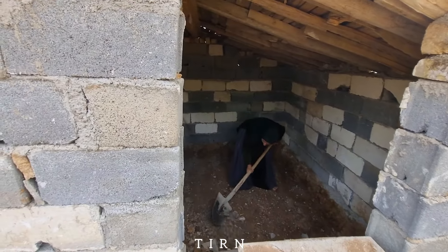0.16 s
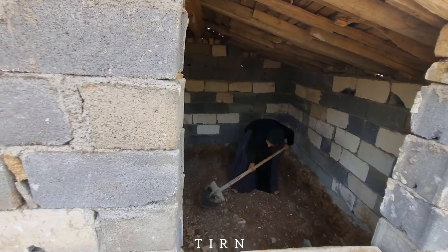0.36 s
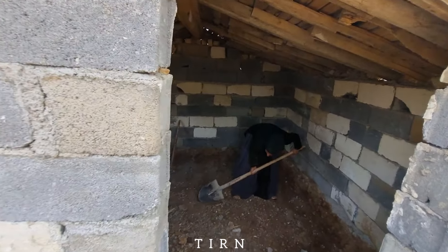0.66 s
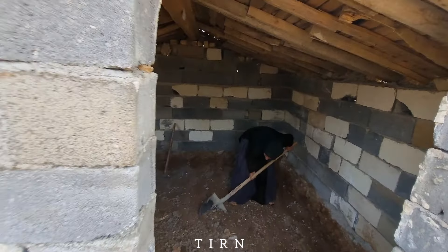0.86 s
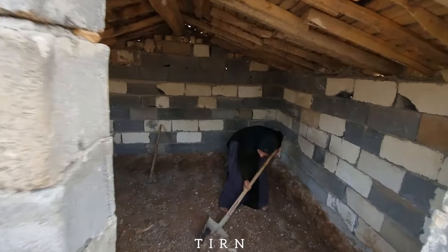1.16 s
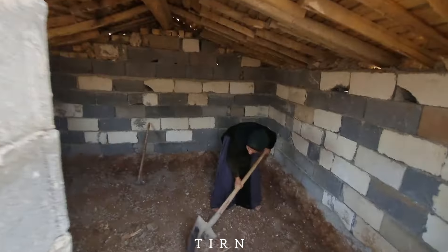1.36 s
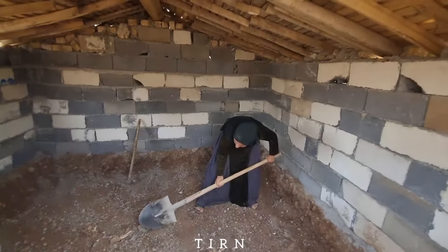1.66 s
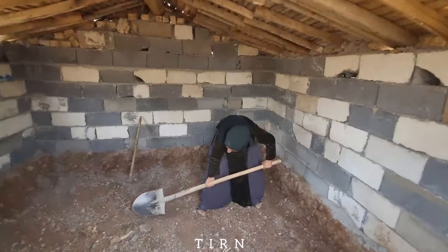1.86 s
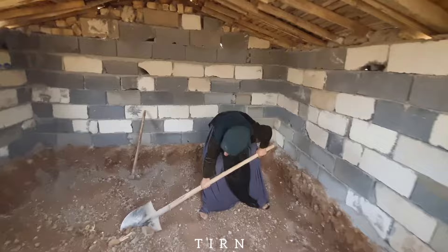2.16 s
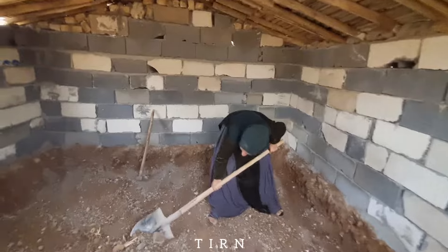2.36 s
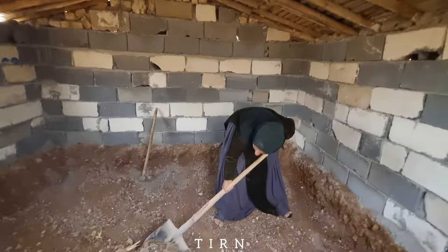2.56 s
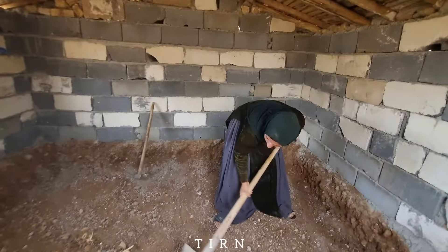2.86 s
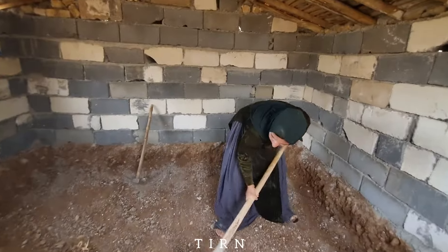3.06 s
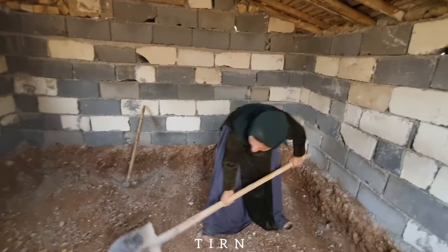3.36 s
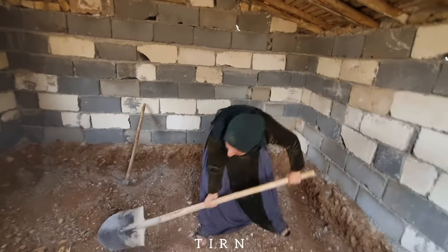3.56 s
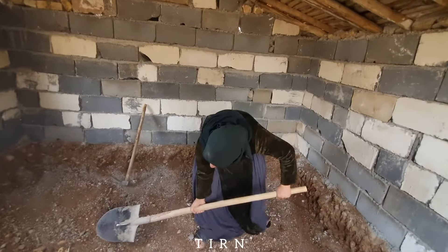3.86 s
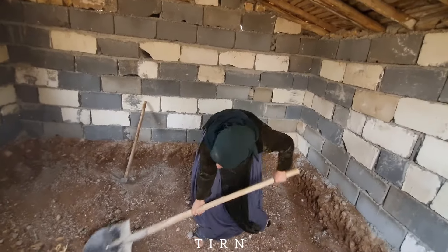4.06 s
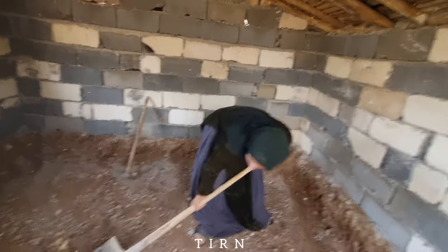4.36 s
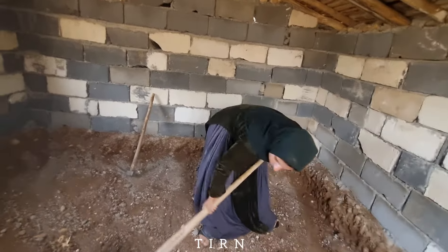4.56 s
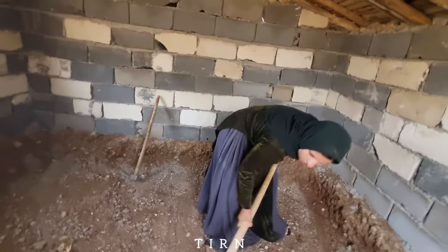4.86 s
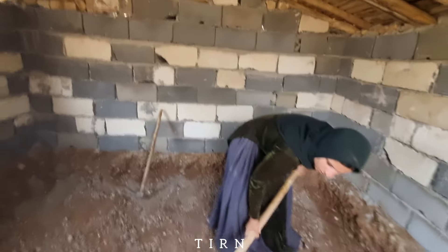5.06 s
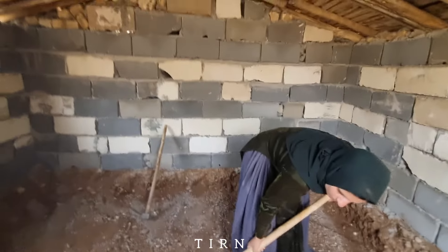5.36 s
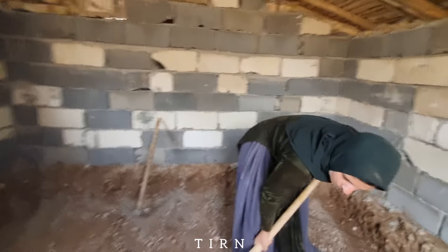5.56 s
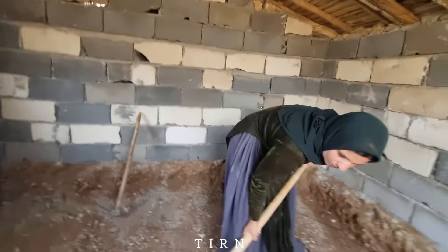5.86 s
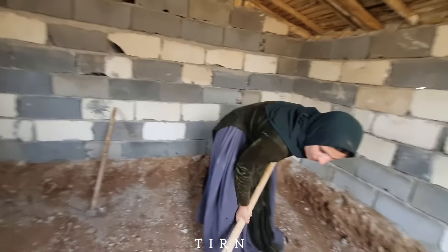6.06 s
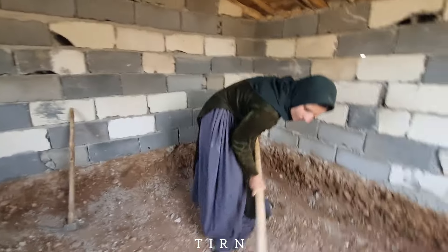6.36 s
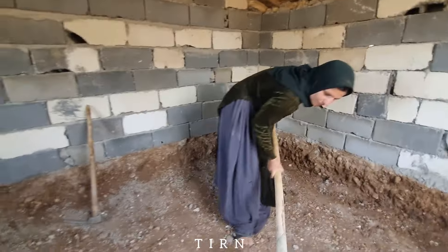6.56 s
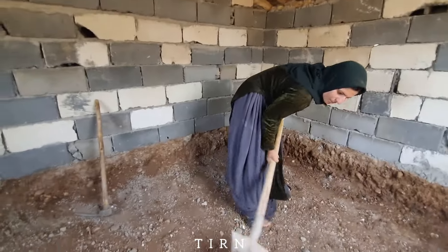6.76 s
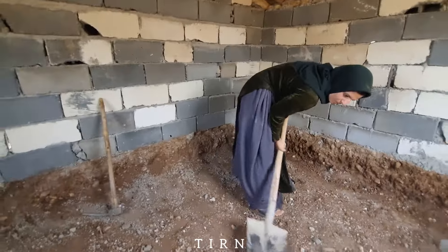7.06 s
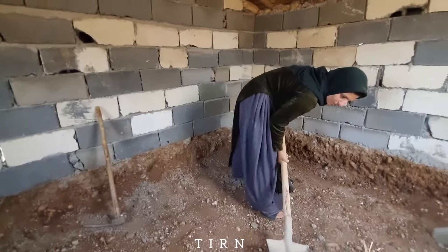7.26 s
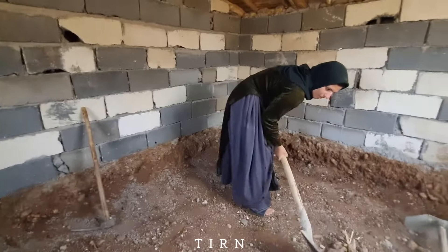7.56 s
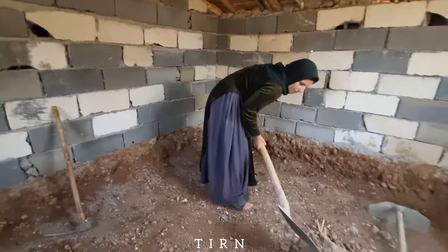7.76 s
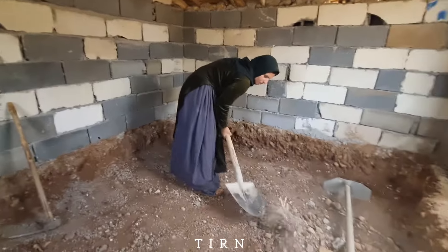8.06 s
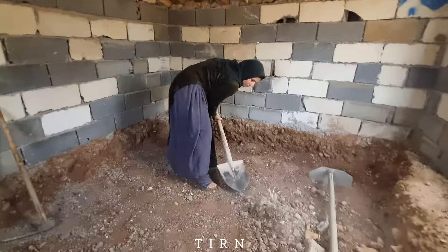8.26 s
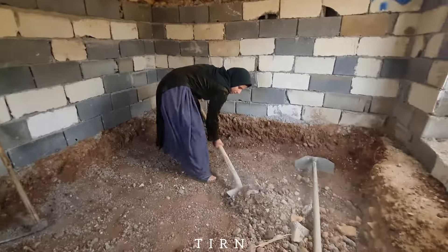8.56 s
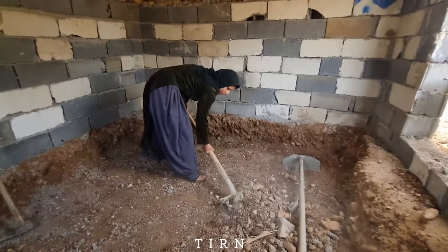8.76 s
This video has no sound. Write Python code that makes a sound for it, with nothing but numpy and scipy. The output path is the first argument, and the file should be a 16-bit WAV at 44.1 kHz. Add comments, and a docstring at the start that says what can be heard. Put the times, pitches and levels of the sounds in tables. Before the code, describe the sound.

Close, uneven shovel strokes scrape through the stony earth floor of a small shed, with very short echoes off the walls. Sand and gravel slide over the steel and stones knock against it. After some softer scraping, the blade bites harder from about halfway, jamming on stones, clinking and thudding into the ground, and ends with one hard shove. Behind it are a faint hiss and a low rumble that fades.

```python
"""Inside a small block-walled shed with an earth floor, two microphone ports stand near a steel shovel,
off to one side, over a low rumble and a faint hiss. The first strokes grind clods, gravel and sand over
the faintly ringing blade, and stones knock on it at about one second. Lighter scrapes follow. From four
seconds the digging is harder: stones jam and crunch, loose pebbles tick, the blade thuds into the ground.
The rumble sinks away, and a last hard push comes just after eight seconds."""
import sys
import numpy as np
from scipy import signal
from scipy.fft import rfft, irfft
from scipy.io import wavfile

SR = 44100
rng = np.random.default_rng(int(sys.argv[2]) if len(sys.argv) > 2 else 0)


def master_out(mix):
    """Clip the mix to full scale and print it as 16-bit PCM to the path in sys.argv[1]."""
    frames = np.transpose(np.atleast_2d(mix))
    ceiling = np.clip(frames, -1, 1)
    pcm = np.round(ceiling * 32767).astype(np.int16)
    wavfile.write(sys.argv[1], SR, pcm)


N = 392490


def from_db(db):
    return 10 ** (np.asarray(db) / 20)


def unit_rms(x):
    return x / np.sqrt(np.mean(x ** 2) + 1e-20)


def in_time(rows):
    return np.interp(np.arange(N) / SR, *np.transpose(rows))


def butter(x, hz, kind):
    return signal.sosfilt(signal.butter(2, hz, kind, fs=SR, output="sos"), x)


def colour(x, spectrum):
    """Causal (minimum-phase) filter with the given dB spectrum."""
    hz, db = np.transpose(spectrum)
    grid = np.maximum(np.arange(2049) * SR / 4096, 1)
    gain = from_db(np.interp(np.log(grid), np.log(hz), db))
    cepstrum = irfft(np.log(gain))
    cepstrum[1:2048] *= 2
    cepstrum[2049:] = 0
    return signal.oaconvolve(x, irfft(np.exp(rfft(cepstrum))))[:N]


def drift(hz):
    """A slow random wander with a spread of 1."""
    r = np.exp(-2 * np.pi * hz / SR)
    return unit_rms(signal.lfilter([1], [1, -2 * r, r * r], rng.standard_normal(N + SR))[SR:])


def ring(clicks, hz, t60):
    """A unit click sets a sine of height 1 ringing."""
    r, w = from_db(-60 / (t60 * SR)), 2 * np.pi * hz / SR
    return signal.lfilter([0, np.sin(w)], [1, -2 * r * np.cos(w), r * r], clicks + 1e-18)


def grains(per_s, spread_db, clump_db):
    """Random contacts of uneven size that come in clumps."""
    sizes = from_db(spread_db * np.minimum(rng.exponential(1, N), 4.2)) * rng.choice([-1, 1], N)
    hits = rng.random(N) < per_s / SR
    return unit_rms(sizes * hits * from_db(clump_db * drift(30)))


# The hiss at the microphone. Each row: frequency in Hz, relative level in dB.
HISS_SPECTRUM = [(15, -63.5), (25, -2), (70, -1.5), (277, -12), (1840, -4), (3720, -60), (5430, -0.5),
                 (10700, -31), (13200, 2.5), (16000, -9)]

def hiss():
    """A faint steady hiss: its lows are shared by the ports, its highs mostly each port's own."""
    noise = 0.26 * rng.standard_normal(N) + butter(rng.standard_normal((2, N)), 400, "high")
    return from_db(-70) * unit_rms(np.array([colour(x, HISS_SPECTRUM) for x in noise]))


# The rumble in the shed. Each row: frequency in Hz, relative level in dB.
RUMBLE_SPECTRUM = [(25, -16.5), (45, -3.5), (64, 16.5), (100, 2.5), (160, 1), (300, -24.5)]
# The rumble between strokes. Each row: time in seconds, level in dB.
RUMBLE_LEVEL = [(0.0, -62), (5.08, -60.5), (8.9, -71)]

def rumble(digging):
    """A low rumble, nearly alike at both ports, that swells with the bass of the digging."""
    shake = np.sqrt(np.abs(butter(butter(digging, 340, "low") ** 2, 15, "low")))
    level = from_db(in_time(RUMBLE_LEVEL)) + from_db(-18.5) * shake
    noise = rng.standard_normal(N) + 0.17 * rng.standard_normal((2, N))
    return level * unit_rms(np.array([colour(x, RUMBLE_SPECTRUM) for x in noise]))


def shed_echoes(x, t60=0.075, changes=24):
    """Dense echoes off the near walls, different at each port, changing as shovel and microphone move."""
    t, out = np.arange(round(.2 * SR)) / SR, np.zeros((2, N + SR))
    hop = N // changes + 1
    padded = np.pad(x, hop)
    for k in range(changes + 1):
        echoes = rng.standard_normal((2, len(t))) * from_db(-60 * t / t60) * (t > .001)
        echoes = butter(echoes, 15000, "low")
        echoes /= np.sqrt(np.sum(echoes ** 2, axis=1, keepdims=True))
        part = padded[k * hop:(k + 2) * hop]
        crossfade = np.sqrt(np.hanning(2 * hop))[:len(part)]
        heard = signal.fftconvolve(part[None] * crossfade, echoes)
        out[:, k * hop:k * hop + heard.shape[1]] += heard
    return out[:, hop:hop + N]


# Thuds in the earth floor. Each row: start in seconds, level in dB, nominal pitch in Hz.
THUDS = [(0.855, -28, 105), (1.099, -30.5, 133), (2.054, -27, 79), (3.675, -36, 94), (4.122, -33, 83),
         (5.551, -22, 90.5), (7.183, -25.5, 128), (8.444, -22, 80.5), (8.481, -28, 75)]

def thuds(t60=.11):
    """The blade hits the ground: dull noise and a low tone that sinks as the soil gives."""
    out = np.zeros(N)
    for start, db, hz in THUDS:
        i = round(start * SR)
        t = np.arange(min(N - i, SR // 2)) / SR
        phase = 2 * np.pi * hz * (.65 * t + 0.0175 * (1 - np.exp(-t / 0.033)))
        dull = unit_rms(butter(rng.standard_normal(len(t)), [.5 * hz, 2 * hz], "band"))
        envelope = from_db(db - 60 * t / t60) * (1 - np.exp(-t / 0.0098))
        out[i:i + len(t)] += envelope * (np.sin(phase) + .8 * dull)
    return out


# Loose single pebbles. Each row: start in seconds, level in dB, pitch in Hz.
TICKS = [(0.386, -29, 5900), (1.5963, -42, 930), (1.622, -20, 12600), (1.6595, -37.5, 1400),
         (1.732, -35.5, 2560), (1.7814, -36, 8450), (1.83, -40.5, 5760), (3.2214, -31, 3000),
         (3.266, -27, 2580), (5.0152, -21.5, 4900), (5.116, -48, 2800), (5.611, -13, 2560),
         (5.677, -11.5, 3000), (5.7236, -21.5, 2770), (5.7819, -19, 4920), (6.5387, -14.5, 5500),
         (6.554, -26, 2500), (6.7904, -27.5, 5300), (6.877, -34, 1450), (7.385, -31, 2620),
         (7.482, -19, 6150), (7.9648, -27.5, 2700), (8.223, -23, 12500), (5.678, -31, 13500),
         (0.4, -28, 5500), (6.682, -30, 5700)]

def pebble_ticks(dust_db=-17.5, dust_s=0.0015):
    """A tick is a few cycles at the pebble's pitch and a puff of dust knocked loose."""
    t, out = np.arange(400) / SR, np.zeros(N)
    for start, db, hz in TICKS:
        i = round(start * SR)
        tick = butter(np.sin(2 * np.pi * hz * t) * np.exp(-t * hz / 1.6), .3 * hz, "high")
        dust = butter(rng.standard_normal(len(t)), 1200, "high") * np.exp(-t / dust_s)
        out[i:i + len(t)] += from_db(db) * (tick + from_db(dust_db) * dust)
    return out


# Modes of the free steel blade. Each row: frequency in Hz, relative level in dB, t60 in seconds.
BLADE_MODES = [(1310, -4, .2), (1430, -3, .35), (1825, -6, .4), (1912, -4, .45), (2229, -6, .5),
               (2408, -1, .5), (2625, -3, .2), (2700, -4, .2), (3747, -8, .3), (4620, -12, .3),
               (5070, -11, .2), (7110, -16, .3), (12300, -24, .2), (510, -2, .12), (650, -1, .15),
               (810, -3, .12), (1110, -3, .15)]
# Pebbles on the free blade. Each row: start in seconds, level in dB, index of the mode struck most.
CLINKS = [(0.122, -50, 0), (0.15, -43, 2), (.2, -45, 4), (.33, -55.5, 3), (4.13, -21, 1), (4.929, -34, 6),
          (5.0, -45, 3), (6.21, -22, 1), (6.514, -43, 5), (6.46, -46, 1), (6.53, -43, 4), (6.575, -48, 3),
          (6.728, -52.5, 3), (7.188, -22.5, 14), (7.201, -27.5, 1), (8.12, -53, 4), (8.2, -47.5, 3)]

def blade_clinks():
    """A pebble rings one mode of the blade, the others weakly; sliding soil makes them waver."""
    out = np.zeros(N)
    for k, (hz, mode_db, t60) in enumerate(BLADE_MODES):
        clicks = np.zeros(N)
        for start, db, struck in CLINKS:
            clicks[round(start * SR)] = from_db(db if round(struck) == k else db + mode_db - 16)
        close_pair = ring(clicks, hz, t60) + .4 * ring(clicks, hz * 1.012, .5 * t60)
        out += close_pair * from_db(2.5 * drift(20))
    return butter(out, 380, "high")


# Bigger stones on the blade. Each row: start in seconds, level in dB, pitch in Hz, t60 in seconds.
KNOCKS = [(0.812, -15, 2570, 0.036), (0.813, -24, 646, 0.037), (1.0, -15, 2710, 0.025),
          (1.03, -13, 2590, 0.042), (1.054, -17.5, 584, 0.091), (1.092, -22.5, 952, 0.08),
          (3.334, -37.5, 455, 0.19), (3.345, -38, 208, 0.091), (4.551, -20, 700, 0.038),
          (4.62, -19, 1180, 0.085), (4.682, -14.5, 704, 0.029), (4.7, -23, 1500, 0.1),
          (4.748, -23, 1140, .05), (4.799, -15, 1490, 0.044), (5.512, -21, 2370, 0.04),
          (5.539, -10.5, 1185, .05), (5.638, -28.5, 1397, 0.054), (6.202, -20, 1710, .05),
          (6.203, -24.5, 470, 0.082), (6.339, -25, 2590, .07), (6.551, -33, 2660, 0.12),
          (7.157, -19, 1220, 0.095), (7.293, -32, 704, 0.044), (7.501, -32, 636, 0.13),
          (8.396, -33, 235, 0.14), (8.444, -18, 237, 0.072), (8.446, -10, 2500, .05), ]

def stone_knocks(split=.05, rise_s=.001):
    """Each slightly soft contact rings briefly on two close pitches that beat."""
    t, out = np.arange(SR // 4) / SR, np.zeros(N)
    for start, db, hz, t60 in KNOCKS:
        i = round(start * SR)
        detune, phase = rng.random(2)
        upper_hz = hz * (1 + split * (detune + .5))
        pair = np.sin(2 * np.pi * hz * t) + 0.52 * np.sin(2 * np.pi * (upper_hz * t + phase))
        out[i:i + len(t)] += from_db(db - 60 * t / t60) * (1 - np.exp(-t / rise_s)) * pair
    return out


# The tone of stony soil on steel. Each row: frequency in Hz, relative level in dB.
SOIL_SPECTRUM = [(71, -37.5), (120, -32.5), (226, -17), (326, -19.5), (500, -7.5), (652, -10), (1420, -4.5),
                 (1570, -7), (2660, 3), (3070, -4.5), (4200, -3.5), (5500, -1.5), (7230, -5.5),
                 (10700, -17.5), (12800, -15.5), (15700, -15.5)]

def stone_rattle(sizes=24, ring_cycles=25):
    """Stones in the moving soil knock and ring briefly, at pitches set by their size."""
    hits, size = grains(500, spread_db=6.5, clump_db=10), rng.integers(0, sizes, N)
    pitches = np.geomspace(220, 5500, sizes)
    rings = sum(ring(hits * (size == k), hz, ring_cycles / hz) for k, hz in enumerate(pitches))
    return unit_rms(colour(rings, SOIL_SPECTRUM))


# Stones jamming under the edge. Each row: start in seconds, level in dB, pitch in Hz, t60 in seconds.
JAMS = [(0.023, -29, 2340, 0.067), (0.81, -23, 2430, 0.054), (0.999, -20, 2700, 0.079),
        (1.029, -17, 570, 0.1), (1.088, -13, 980, 0.03), (1.614, -45.5, 7000, 0.081),
        (2.001, -22, 2270, 0.43), (2.052, -18.5, 2760, 0.048), (2.243, -28.5, 684, 0.1),
        (2.564, -28.5, 1300, 0.2), (2.731, -23.5, 2670, 0.025), (2.836, -31, 5400, 0.052),
        (2.902, -25, 1590, 0.13), (2.954, -27.5, 2530, 0.11), (3.335, -38.5, 380, 0.12),
        (3.967, -23.5, 4000, 0.094), (3.976, -16.5, 4500, 0.16), (4.116, -11.5, 3120, 0.18),
        (4.207, -22.5, 6000, 0.2), (4.251, -13.5, 3800, 0.028), (4.28, -14, 3020, 0.092),
        (4.356, -11, 3600, 0.044), (4.503, -17.5, 2560, 0.02), (4.548, -21.5, 820, 0.049),
        (4.684, -11.5, 1820, 0.038), (4.745, -13.5, 1300, 0.044), (4.798, -19.5, 2090, 0.18),
        (4.922, -32, 1300, 0.1), (5.416, -31, 1600, 0.15), (5.505, -14, 3250, 0.093),
        (5.991, -28, 1190, 0.067), (6.024, -27.5, 5200, 0.037), (6.058, -20.5, 2900, 0.29),
        (6.116, -17.5, 4100, 0.044), (6.137, -14, 1540, 0.039), (6.2, -10, 1660, 0.11),
        (6.338, -23.5, 3040, 0.084), (6.917, -24, 4730, 0.078), (7.05, -21, 2030, 0.14),
        (7.142, -16, 4000, 0.11), (7.175, -10, 4880, 0.027), (7.191, -3.5, 1830, 0.016),
        (7.5, -22.5, 4770, 0.096), (7.569, -23, 2500, 0.063), (7.674, -35, 1270, 0.19),
        (8.039, -28, 2880, 0.23), (8.346, -28.5, 1520, 0.16), (8.368, -20, 2600, 0.56),
        (8.444, -11.5, 2470, 0.051), (8.792, -35.5, 1640, 0.064)]

def stone_jams(hold_share=0.061, rise_s=0.0019):
    """A jam holds for a moment, then gives: a fast-dying burst of grit around its stone's pitch."""
    grit = unit_rms(colour(grains(9000, spread_db=3.54, clump_db=2.5), SOIL_SPECTRUM))
    out = np.zeros(N)
    for start, db, hz, t60 in JAMS:
        i = round(start * SR)
        t = np.arange(min(N - i, SR // 3)) / SR
        burst = grit[i:i + len(t)]
        press = from_db(db - 60 * np.maximum(t / t60 - hold_share, 0)) * (1 - np.exp(-t / rise_s))
        stone = unit_rms(signal.lfilter(*signal.iirpeak(hz, Q=3, fs=SR), burst))
        loose_gain = from_db(5 + 10 * np.log2(hz / 2500))   # small stones are grittier
        crunch = stone + loose_gain * butter(burst, hz / 4, "high")
        out[i:i + len(t)] += press * crunch / np.sqrt(1 + loose_gain ** 2)
    return out


# Pushes and slides of the blade. Each row: start and length in seconds, gravel level at the start and
# at the end in dB, its fall afterwards in dB per second, clods and sand in dB relative to the gravel.
PUSHES = [(0, 0.036, -30, -35, 310, -2.5, -8.5), (0.067, 0.066, -50, -44, 110, -22, 4),
          (0.699, 0.11, -31.5, -28.5, 250.5, -13.5, -1), (0.82, 0.3, -37.5, -36.5, 293, -6.5, -3.5),
          (1.158, 0.24, -53, -45, 75, -13, -2.5), (1.992, 0.14, -31, -30.5, 144, -1.5, -1),
          (2.285, 0.075, -38.5, -26, 99, -3.5, -3), (2.472, 0.24, -35.5, -34, 142, -5.5, -1),
          (2.839, 0.37, -34, -40.5, 113, -20.5, 0.5), (3.332, 0.094, -79, -64, 116, 4, -10),
          (3.5, 0.17, -66, -42, 409, 0, -5), (3.879, 0.051, -60.5, -63, 105.5, 3.5, -1),
          (3.964, 0.37, -35, -25.5, 167, -7.5, -1.5), (4.445, 0.13, -35.5, -32, 104, -4, -3),
          (4.606, 0.061, -17, -19, 260, -17.5, -2.5), (4.712, 0.021, -43.5, -23, 92, -12, -4),
          (5.413, 0.04, -38, -38, 204.5, -20, -15.5), (5.457, 0.067, -25.5, -17, 265, -13, -8.5),
          (5.575, 0.15, -37, -50.5, 288, -1.5, -5), (5.783, 0.21, -77, -51, 102, -15, -1.5),
          (5.983, .37, -28, -27.5, 216, -11.5, -5), (6.418, 0.045, -48, -41.5, 79, -39, 0),
          (6.762, 0.18, -65.5, -49, 179, -4, -6), (6.911, 0.26, -41, -21.5, 250, -20.5, -4),
          (7.276, 0.054, -31, -34.5, 91, -8, -6), (7.49, .26, -36, -40.5, 127, -17.5, -1),
          (7.88, 0.22, -60, -68, 198, -32, 10), (8.026, 0.028, -57, -42, 73, -15, -5.5),
          (8.334, 0.13, -56.5, -19.5, 298, 1.5, 2), (8.463, 0.15, -16, -26, 222, -5.5, -4),
          (8.751, 0.088, -54, -59, 351, 4.5, 1.5)]

def push_levels(bite_s=0.0056):
    """Levels in dB of gravel, clods and sand: each push bites, swells or sags steadily, then falls."""
    power, grid = 1e-12, np.arange(0, N + 64, 64) / SR
    settling = np.c_[1, 0.9, 0.84].T   # clods and sand settle more slowly than gravel
    for start, length, first_db, last_db, fall, clods_db, sand_db in PUSHES:
        t = grid - start
        held_db = np.interp(t, [0, length], [first_db, last_db]) + np.c_[0, clods_db, sand_db].T
        db = held_db - fall * settling * np.maximum(t - length, 0)
        power = power + from_db(2 * db) * np.clip(t / bite_s, 0, 1) ** 2
    return [np.interp(np.arange(N) / SR, grid, 10 * np.log10(p)) for p in power]


def shovel_grind(clod_hz=1300, sand_hz=6100):
    """Clods, gravel and sand grind over one patch of the blade; the bigger stones drive its modes."""
    gravel_db, clods_db, sand_db = push_levels()
    push = from_db(gravel_db)
    grit = colour(grains(2500, spread_db=3.3, clump_db=4), SOIL_SPECTRUM)
    lumps = colour(grains(1200, spread_db=4, clump_db=2), SOIL_SPECTRUM)
    clods = unit_rms(butter(butter(lumps, clod_hz, "low"), clod_hz, "low"))
    sand = unit_rms(butter(butter(grit, sand_hz, "high"), sand_hz, "high"))
    gravel = butter(butter(grit, clod_hz, "high"), sand_hz, "low")
    broad_ring = from_db(4 * drift(5) - 1.5)   # comes and goes with the soil on the blade
    gravel = unit_rms(gravel + (broad_ring - 1) * butter(gravel, (2000, 3100), "band"))
    grind = push * gravel + from_db(sand_db) * sand + from_db(clods_db) * clods
    damping = 0.084   # soil on the blade shortens its ring
    steel = sum(from_db(db) * ring(push * grains(120, spread_db=4.1, clump_db=3), hz, t60 * damping)
                for hz, db, t60 in BLADE_MODES)
    rattle_db = (gravel_db + clods_db) / 2 - 7
    return grind + stone_jams() + from_db(-30) * steel + from_db(rattle_db) * stone_rattle()


def ports(x, lead_s):
    """The sound at the left port and, lead_s later, at the right."""
    return np.array([x, np.interp(np.arange(N) - lead_s * SR, np.arange(N), x)])


# The tone of the work at the left port. Each row: frequency in Hz, left minus right in dB.
LEFT_PORT = [(60, -8.5), (110, 3), (200, 1), (380, 1), (700, -1), (1290, 0), (2380, -5.5), (4400, -3.5),
             (8120, -5), (15000, -9.5)]
# Where the work is heard from. Each row: time in seconds, leftward lean in dB (its mean is taken off).
BEARING = [(0.0, -3), (8.01, -5.0), (8.9, -5.5)]

def microphone(left, right):
    """Heard from one side, the work has its own tone at the left port and edges slowly to the right."""
    lean_db = in_time(BEARING)
    balance = from_db(np.c_[.5, -.5].T * (lean_db - lean_db.mean()))
    return np.array([colour(left, LEFT_PORT), right]) * balance


def scene():
    """Three patches across the blade grind separately, each with its own lead at the left port."""
    lead_s, patch_step_s = 0.00017 + 0.00012 * drift(1.49), 0.0001
    grind = sum(ports(shovel_grind() / np.sqrt(3), lead_s + k * patch_step_s) for k in (-1, 0, 1))
    taps = ports(pebble_ticks() + blade_clinks() + stone_knocks(), lead_s)
    to_walls = butter(grind[0] + from_db(-1) * taps[0], 740, "high")   # taps stand clearer of the echoes
    left, right = grind + taps + from_db(-4) * shed_echoes(to_walls)
    return microphone(left, right) + hiss() + rumble(right) + thuds()


def record(dry):
    """The deepest bass is lost, peaks are rounded, the top is cut steeply."""
    rounded = .9 * np.tanh(butter(dry, 38, "high") / .9)
    return signal.sosfilt(signal.ellip(12, .5, 80, 15750, fs=SR, output="sos"), rounded)


dry = scene()
out = record(dry)
master_out(out)
```